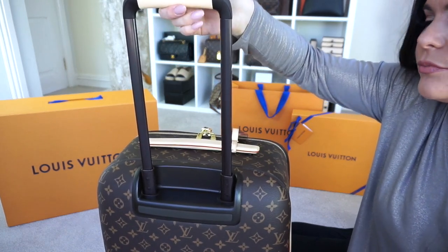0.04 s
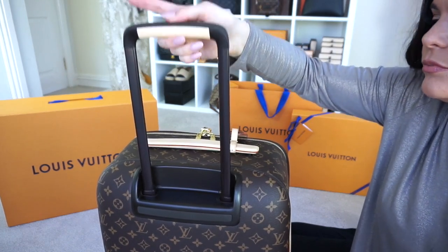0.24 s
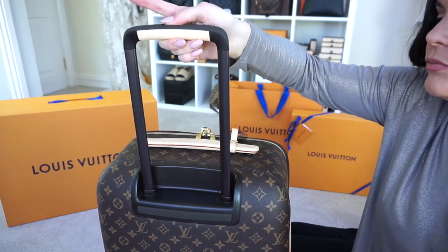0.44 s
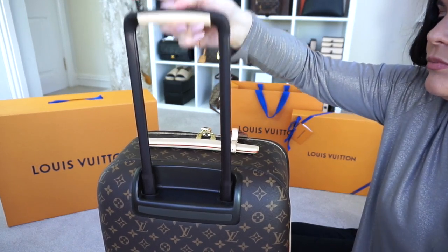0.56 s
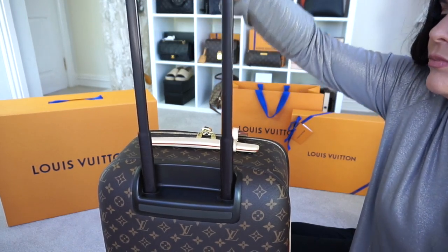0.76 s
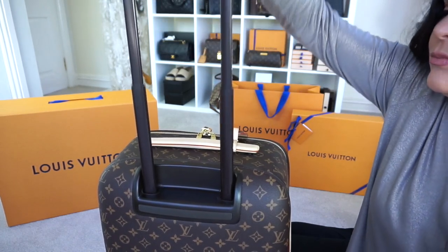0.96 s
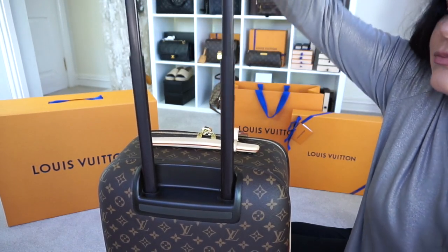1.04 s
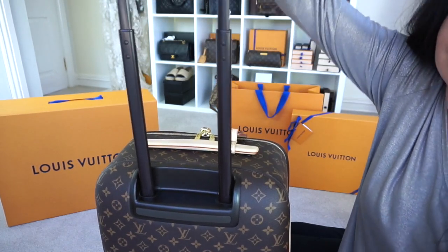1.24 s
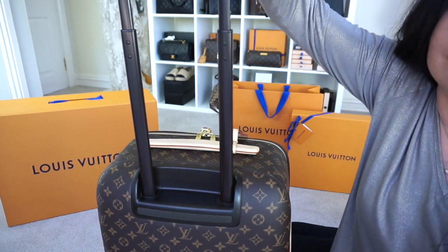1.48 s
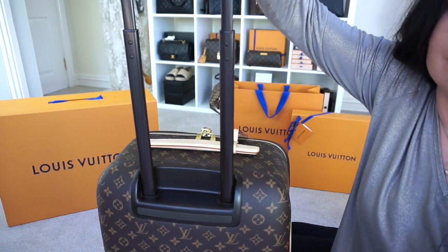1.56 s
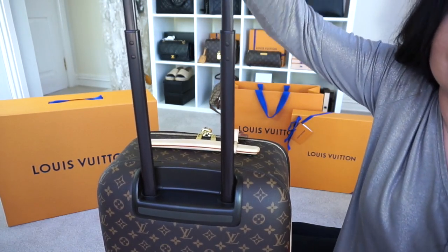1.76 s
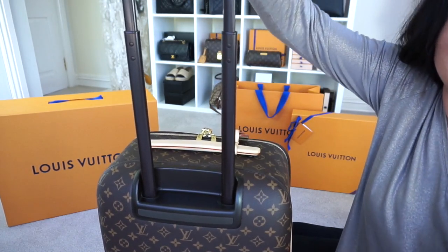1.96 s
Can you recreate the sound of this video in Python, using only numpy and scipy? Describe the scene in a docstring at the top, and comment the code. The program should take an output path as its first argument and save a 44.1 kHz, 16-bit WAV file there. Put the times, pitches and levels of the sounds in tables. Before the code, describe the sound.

A telescopic suitcase handle slides up with a faint rustle and locks with one sharp click.

```python
"""In a quiet furnished room, a telescopic suitcase handle is pushed down a little, pulled up and locks.
Spring pins tick and tubes knock: short contacts set groups of decaying modes ringing.
Tubes rub in their sleeves: dense tiny catches ring the tube modes and hiss.
The hollow case thuds softly, most strongly at the lock; echoes and a diffuse tail surround the handle.
Underneath lie room tone and a faint, very high whine."""
import sys
import numpy as np
from scipy import signal
from scipy.fft import rfft, irfft
from scipy.io import wavfile
from scipy.ndimage import uniform_filter1d

SR = 44100
rng = np.random.default_rng(int(sys.argv[2]) if len(sys.argv) > 2 else 0)


def nominal_scale(level):
    """Amplitude ratio for a level in decibels (scalar or array-like)."""
    x = np.asarray(level, float) / 20
    return 10 ** x


def digitize_waveform(pressure):
    """Quantize a signal to 16-bit integers and store it at the path in sys.argv[1].

    Rows of a 2-D input are taken as channels; values are limited to [-1, 1].
    """
    field = np.atleast_2d(pressure).T
    bounded = np.clip(field, -1, 1)
    quanta = np.round(bounded * 32767).astype(np.int16)
    wavfile.write(sys.argv[1], SR, quanta)


N = 88905  # length in samples

# ringing modes of the handle tubes: pitch_hz, knocked_db, t60_s, rubbed_db
TUBE_MODES = [(352, -13, 0.083, -6.5), (427.4, -2, 0.048, -2.5), (523, -13.5, .02, -3),
              (713, -4.5, .02, -13.5), (958, 6.5, 0.004, 2.5), (1120, 7.5, 0.004, -0.5),
              (1359, -7, 0.0053, -15), (1741, 1, 0.015, -6), (2236, 10, 0.0036, 3.5), (2870, 2, 0.021, -7),
              (3370, 10.5, 0.004, -8.5), (4420, -17.5, 0.0013, -8.5)]


def pin_ticks():
    """Spring pins snap against metal and ring bright, very short modes, each tick at its own stereo place."""
    # ticks: start_s, level_db, centre_hz, spread_octaves, contact_s, left_minus_right_db; rows centred at 3300
    # Hz are knocks, one of them at the lock
    ticks = [(0.0548, -33, 12400, 0.91, 0.0019, 2.5), (0.1247, -44, 10200, 0.98, 0.00085, 3),
             (.1424, -50, 6500, .6, .0015, 3), (0.1525, -43.5, 11900, 1.2, 0.0011, 6),
             (.172, -41, 12500, 1.1, 0.0011, 5), (0.185, -52, 12100, .9, .001, 2),
             (0.2032, -41, 13400, 1.3, .0012, 11), (0.21, -49, 12300, 1, 0.0013, 6),
             (0.2558, -39, 11400, 0.77, .0012, 10), (0.2637, -42, 10900, .6, .0008, 2),
             (0.3566, -43.5, 8000, 1.2, 0.0017, 3), (.3918, -27.5, 12700, 0.89, .0016, 4),
             (.3922, -38, 3300, 0.55, .0014, -1), (1.0273, -35, 11400, 0.62, 0.00066, 4.5),
             (1.0799, -31, 8500, 0.8, 0.0011, 0), (1.1073, -35, 12000, 0.73, 0.002, 0.5),
             (1.1952, -24.5, 11500, 0.92, 0.00053, 1.5), (1.2185, -10, 10100, 0.49, 0.0015, 5.5),
             (1.2183, -17.5, 3300, 0.55, 0.001505, 1), (1.2226, -19.5, 11500, 0.64, 0.0015, -2),
             (1.3389, -38, 11000, .9, 0.0014, -3.5), (1.5174, -52.5, 10150, 0.8, 0.00095, 6),
             (1.6087, -51, 5510, .75, 0.00076, 4.5), (1.6124, -54.5, 10190, 0.76, .0014, 3),
             (1.807, -52.5, 13000, 0.37, 0.00098, 2), (1.8409, -38, 11100, 1.16, .002, 5.5),
             (1.952, -44.5, 11100, 0.89, 0.002, 5), (1.9574, -44, 10800, 0.77, 0.00069, 0)]
    # ringing modes of a pin, the lowest (3300 Hz) being a knock that sounds along with the pins: pitch_hz,
    # level_db, t60_s
    pin_modes = [(3300, -3.5, 0.0017), (4395, -5, .002), (5560, 12, 0.0009), (6500, -17.5, 0.0021),
                 (7254, 3.5, 0.001), (8360, 1.5, 0.0014), (9680, 4.5, 0.0015), (9825, 0, 0.006),
                 (10900, 6.5, 0.006), (12280, -12.5, 0.0022), (12580, 9.5, 0.00067), (13390, 6.5, 0.0035),
                 (14810, -4.5, .002), (16300, -14, .0015)]
    out = np.zeros((2, N))
    chances = rng.standard_normal((len(ticks), 60))
    for (start_s, level_db, centre_hz, octaves, contact_s, pan_db), chance in zip(ticks, chances):
        tick = blow(pin_modes, centre_hz, octaves, contact_s, level_db, chance)
        sides = nominal_scale(np.array([[pan_db / 2], [-pan_db / 2]]))
        add(out, start_s, tick * sides)
    return thin(out)


def tube_knocks():
    """Tube knocks against sleeve, ringing the duller tube modes in the middle of the image."""
    # knocks: start_s, level_db, centre_hz, spread_octaves, contact_s
    knocks = [(0.051, -41.5, 659, 1.7, 0.0018), (0.125, -52, 2150, 0.85, 0.00081),
              (0.137, -39.5, 888, 1.2, 0.0015), (0.152, -46, 2240, 0.77, 0.0022),
              (0.171, -57, 2230, 1.2, 0.0029), (0.2, -48, 2040, 0.8, 0.0022),
              (0.246, -30, 727, 1.57, 0.0026), (0.359, -71, 2250, 1.4, 0.0018),
              (0.392, -39.5, 2540, 1.1, 0.0018), (0.404, -60, 2580, 0.97, 0.0012),
              (0.445, -48, 2400, 1.7, 0.0015), (0.454, -39.5, 1300, 1.66, 0.0016),
              (0.464, -71, 2240, 1.7, 0.0045), (0.521, -52, 398, 1.2, 0.002),
              (0.546, -51.5, 423, 1.5, 0.0018), (0.653, -40, 2220, 0.54, 0.0019),
              (0.677, -44, 345, 1.7, 0.0029), (1.024, -35, 2220, 1.7, 0.0026),
              (1.077, -28, 3470, 1.7, 0.0014), (1.161, -28, 1120, 1.3, 0.0018),
              (1.195, -40, 3630, 1.6, 0.0018), (1.212, -42.5, 1280, 1.2, 0.0015),
              (1.218, -13.5, 1100, 1.36, 0.0016), (1.225, -24.5, 996, 0.95, 0.00062),
              (1.517, -59, 2270, 1.4, 0.0021), (1.607, -52, 3710, 1.3, 0.0014),
              (1.682, -49, 3460, 1.7, 0.0016), (1.695, -52.5, 404, 1.7, 0.0027),
              (1.777, -62.5, 3960, 1.4, 0.0026), (1.842, -43.5, 1840, 0.98, 0.0011),
              (1.943, -52.5, 2750, 1.6, 0.0017), (1.951, -46.5, 3210, 0.57, 0.00099)]
    out = np.zeros((2, N))
    chances = rng.standard_normal((len(knocks), 60))
    for (start_s, level_db, centre_hz, octaves, contact_s), chance in zip(knocks, chances):
        knock = blow(TUBE_MODES, centre_hz, octaves, contact_s, level_db, chance)
        add(out, start_s, knock[None])
    return thin(out)


def rubbing():
    """Dense tiny catches ring the tube modes, each swelling unevenly, and hiss at the sleeve."""
    # course of the rubbing: time_s, hum_db, tilt_db_per_octave, hiss_db
    course = np.array([(0.099, -72, 13, -76), (0.137, -64, -13, -63), (.19, -55, 3, -64),
                       (0.234, -66, 11.5, -63), (0.252, -53, -4, -60), (0.287, -52.5, 6, -51.5),
                       (0.317, -51, 4.5, -54.5), (.33, -68.5, 0.5, -69), (0.399, -56.5, 8, -66.5),
                       (0.469, -67.5, -10.5, -81), (.48, -89.5, -4.5, -69), (.64, -61.5, -1, -71),
                       (0.659, -62, -18, -64.5), (0.728, -59.5, 1, -61), (.83, -56.5, -1, -60),
                       (0.921, -59.5, -2.5, -58.5), (1.015, -53, -0.5, -54), (1.039, -51, 2.5, -52.5),
                       (1.121, -47.5, 3.5, -47.5), (1.21, -47.5, 8, -44.5), (1.231, -44, -0.5, -43),
                       (1.4, -78.5, -3, -52.5), (1.498, -101.5, -3, -95.5), (1.669, -88, 5.5, -99),
                       (1.698, -73.5, -3, -99), (1.761, -93.5, -5, -92.5), (1.84, -101, -2, -81),
                       (1.864, -61.5, 33.5, -58), (1.921, -96, 13, -82), (1.975, -72.5, 49, -70),
                       (2.01, -97, 3, -97)])
    # hiss spectrum: pitch_hz, density_db_per_hz
    hiss_spectrum = [(2060, -33), (3500, -19.5), (5600, -43), (6240, 2.5), (7040, -4), (9870, 10),
                     (13200, 4.5), (14900, 7), (16000, -7.5)]
    catches_per_s, catch_spread_db, side_share = 2500, 1, 0.28
    t = np.arange(N) / SR
    hum_db = np.interp(t, course[:, 0], course[:, 1], left=-120)
    tilt_db = np.interp(t, course[:, 0], course[:, 2])
    hiss_db = np.interp(t, course[:, 0], course[:, 3], left=-120)

    size = nominal_scale(catch_spread_db * np.minimum(rng.exponential(1, (2, N)), 5))
    size = size * (rng.random((2, N)) < catches_per_s / SR)
    mid, side = size * rng.standard_normal((2, N))
    catches = np.array([mid + side_share * side, mid - side_share * side])

    hum, power = 0, 0
    for hz, _, t60, rubbed_db in TUBE_MODES:
        pitch = hz * (1 + 0.02 * lumps(N, 0.037))  # wanders by 2 percent rms
        ring = resonate(catches, pitch, 0.65 * t60)
        ring = evened(resonate(ring, pitch, 0.64 * t60))
        gain = nominal_scale(rubbed_db + tilt_db * np.log2(hz / 1000))
        swell = nominal_scale(3.5 * lumps(N, 0.011))
        hum = hum + gain * ring * swell
        power = power + gain ** 2
    hum = thin(hum / np.sqrt(power))  # the tilt changes the colour, not the overall level

    # each catch smears into a short noise burst, over steady noise
    smear = rng.standard_normal((2, 300)) * nominal_scale(-60 * t[:300] / 0.0099)
    hiss = signal.oaconvolve(catches, smear / np.linalg.norm(smear[0]), axes=1)[:, :N]
    steady = 2.4 * np.std(catches) * rng.standard_normal((2, N))
    hiss = evened(colour(hiss + steady, hiss_spectrum))
    hiss_sides = nominal_scale(np.array([[1.5], [-1.5]]))  # leans left
    return nominal_scale(hum_db) * hum + nominal_scale(hiss_db) * hiss * hiss_sides


def case_thuds():
    """The hollow shell booms softly and unevenly when the handle jolts it, ringing its low modes."""
    # thuds: start_s, level_db, centre_hz
    thuds = [(.07, -63.5, 200), (0.168, -64, 135), (0.252, -67.5, 182), (0.668, -64.5, 135),
             (.75, -74, 135), (1.215, -39, 233), (1.264, -46, 204)]
    # ringing modes of the shell: pitch_hz, level_db, t60_s
    case_modes = [(135, -5, 0.3), (182, -12.5, 0.48), (200, -5, 0.66), (215.1, -4.5, 0.53),
                  (234.1, -1.5, 0.349), (268.4, 6, 0.3), (283.9, 0, 0.186)]
    contact_s, octaves = 0.011, 0.85
    out = np.zeros(N)
    chances = rng.standard_normal((len(thuds), 60))
    for (start_s, level_db, centre_hz), chance in zip(thuds, chances):
        add(out, start_s, blow(case_modes, centre_hz, octaves, contact_s, level_db, chance / 2))
    return out * nominal_scale(1.5 * lumps(N, 0.042))


def room(x):
    """A few early echoes, then sparse random taps that die band by band; the bass arrives alike on both sides."""
    # decay by band: pitch_hz, t60_s
    decay = [(150, 0.69), (500, 0.34), (1500, 0.36), (4000, 0.44), (9000, 0.24), (15000, 0.093)]
    # early echoes: delay_s, left_db, right_db
    echoes = [(.0086, -9.5, -22.5), (0.0127, -21.5, -12), (0.016, -49, -21)]
    tail_db, mono_hz = -5, 872
    taps = np.zeros((2, SR))
    slots = np.arange(300, SR - 20, 10)
    at = slots + rng.integers(0, 10, (2, len(slots)))
    np.put_along_axis(taps, at, rng.choice([-1., 1.], at.shape), 1)

    hz, t, z = signal.stft(taps, SR, nperseg=512)
    wide = (hz / np.hypot(hz, mono_hz))[:, None]  # stereo width grows with pitch
    z = np.array([z[0] + wide * z[1], z[0] - wide * z[1]]) / np.sqrt(1 + wide ** 2)
    decay_hz, decay_s = np.transpose(decay)
    t60 = np.interp(np.log(hz + 1), np.log(decay_hz), decay_s)[:, None]
    tail = signal.istft(z * nominal_scale(-60 * t / t60), SR, nperseg=512)[1]
    tail = nominal_scale(tail_db) * tail / np.linalg.norm(tail[0])
    for delay_s, left_db, right_db in echoes:
        add(tail, delay_s, nominal_scale(np.array([[left_db], [right_db]])))
    return signal.fftconvolve(x, tail, axes=1)[:, :N]


def stillness():
    """Room tone as coloured noise, and a faint, very high electronic whine, heard at an uneven level."""
    # room tone spectrum: pitch_hz, density_db_per_hz
    tone_spectrum = [(20, -27.5), (100, -12.5), (200, -5.5), (310, -4.5), (800, -4.5), (1500, -8),
                     (3000, -9), (6000, -13), (9000, -21), (12000, -14), (15000, -19.5), (16500, -33)]
    tone_db, shared = -69.5, 0.2  # shared: correlation of right with left
    whine_hz, whine_db, uneven_db = 15625, -77, 2.5
    left, other = rng.standard_normal((2, N))
    right = shared * left + np.sqrt(1 - shared ** 2) * other
    hush = evened(colour(np.array([left, right]), tone_spectrum))
    whine = np.sqrt(2) * np.sin(2 * np.pi * whine_hz * np.arange(N) / SR)
    heard_level = nominal_scale(whine_db + uneven_db * lumps(N, 0.015))
    return nominal_scale(tone_db) * hush + heard_level * whine


def blow(modes, centre_hz, octaves, contact_s, level_db, chance):
    """Modes near centre_hz swell over a chattering contact and die away, slightly detuned each time."""
    hz, mode_db, t60 = np.transpose(modes)[:3, :, None]
    detune, chatter_depth = 0.027, 0.35
    contact_s, count = np.clip(contact_s, .0004, .03), len(modes)
    t = np.arange(0, contact_s + t60.max(), 1 / SR)
    mode_db = mode_db - 10 * (np.log2(hz / centre_hz) / max(octaves, .2)) ** 2
    fall = nominal_scale(mode_db - 60 * np.maximum(t - contact_s, 0) / t60)
    pitch = hz * (1 + detune * np.tanh(chance[:count, None]))
    turns = pitch * t + chance[count:2 * count, None]  # random starting phase
    rise = np.sin(np.pi / 2 * np.minimum(t / contact_s, 1)) ** 2
    # random level bends, six to a contact time, running on into the ring
    chatter = 1 + chatter_depth * np.interp(t / contact_s * 6, np.arange(30), chance[30:], right=0)
    sound = rise * chatter * (fall * np.sin(2 * np.pi * turns)).sum(0)
    return nominal_scale(level_db) * sound / np.linalg.norm(nominal_scale(mode_db))


def resonate(x, hz, t60):
    """A resonance of gliding pitch: shifts the curve hz down to zero, smooths, and shifts back."""
    turn = np.exp(2j * np.pi * np.cumsum(hz) / SR)
    r = nominal_scale(-60 / (t60 * SR))
    return (turn * signal.lfilter([1 - r], [1, -r], x / turn)).real


def thin(x):
    """The light tubes radiate little bass: the level falls 40 dB in the octave below 278 Hz."""
    return colour(x, [(278 / 2, -40), (278, 0)])


def lumps(shape, length_s):
    """Slow random curve of rms 1: noise smoothed twice over length_s."""
    size = max(round(length_s * SR), 2)
    smooth = uniform_filter1d(rng.standard_normal(shape), size)
    return evened(uniform_filter1d(smooth, size))


def evened(x):
    """Scales to rms 1."""
    return x / np.sqrt(np.mean(x ** 2) + 1e-20)


def colour(x, points):
    """Filters x by a (Hz, dB) spectrum, interpolated over log frequency."""
    f, db = np.transpose(points)
    hz = np.fft.rfftfreq(x.shape[-1], 1 / SR)
    gain = nominal_scale(np.interp(np.log(hz + 1), np.log(f + 1), db))
    return irfft(rfft(x) * gain, x.shape[-1])


def add(mix, start_s, sound):
    """Mixes a sound in at start_s, cut off at the end of the mix."""
    part = mix[..., round(start_s * SR):][..., :sound.shape[-1]]
    part += sound[..., :part.shape[-1]]


def scene():
    """The handle, its room, the hollow case and the quiet around them."""
    handle = pin_ticks() + tube_knocks() + rubbing()
    return handle + room(handle) + case_thuds() + stillness()


def band_limit(x):
    """A steep low-pass at the top of the band."""
    return signal.sosfilt(signal.butter(12, 16780, fs=SR, output="sos"), x)


def record(dry):
    """The microphone loses the top edge, above about 15.8 kHz."""
    lowpass = signal.firwin(63, 15800, window=("kaiser", 7), fs=SR)
    mix = signal.oaconvolve(dry, lowpass[None], "same")
    return band_limit(mix)


dry = scene()
out = record(dry)
digitize_waveform(out)
```